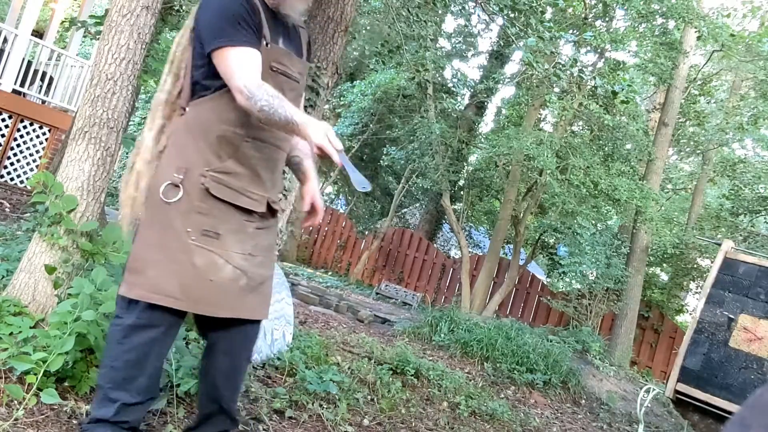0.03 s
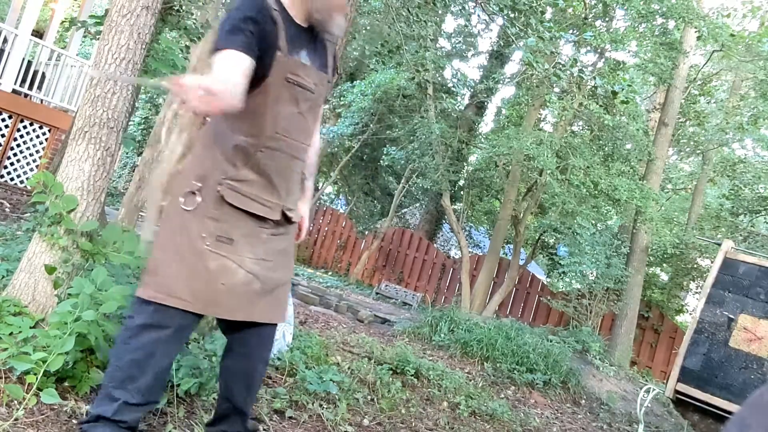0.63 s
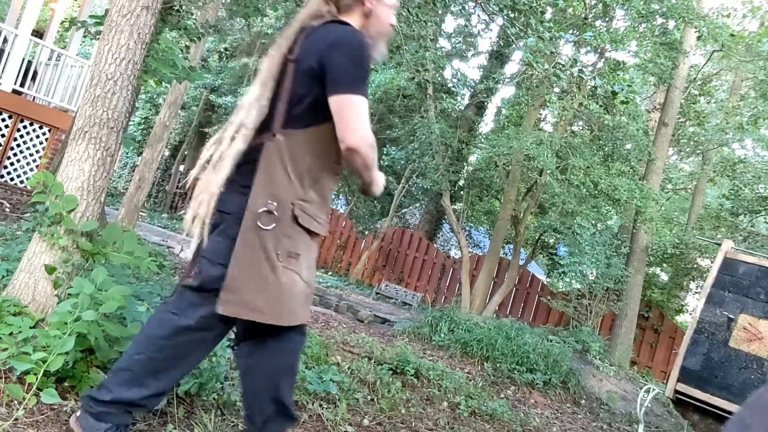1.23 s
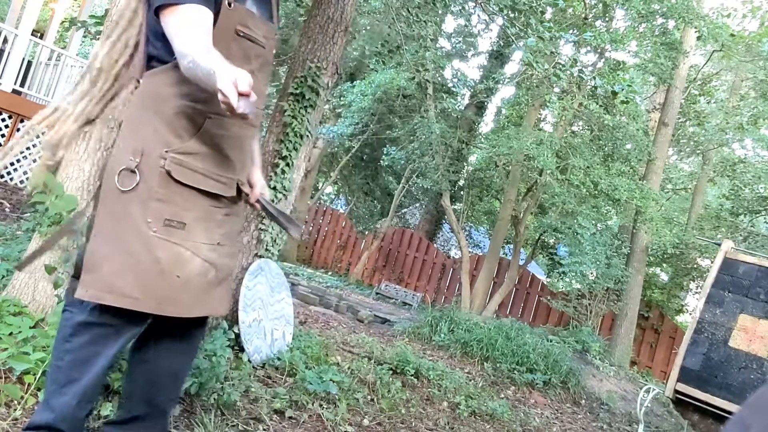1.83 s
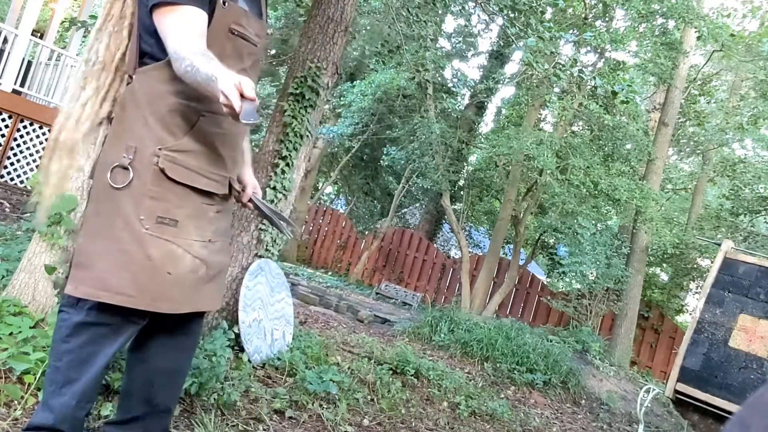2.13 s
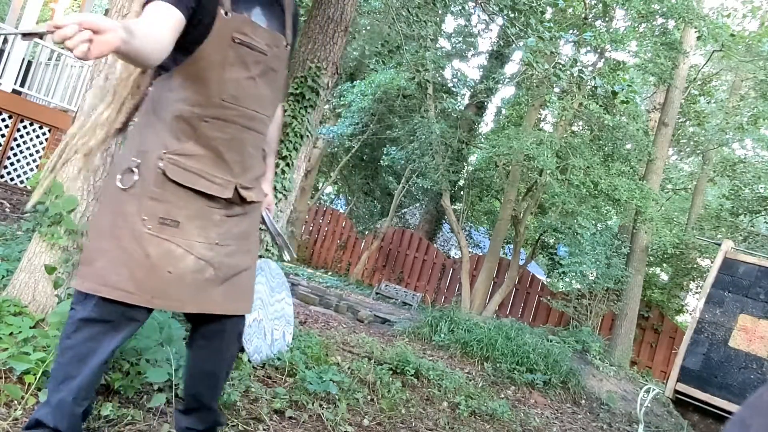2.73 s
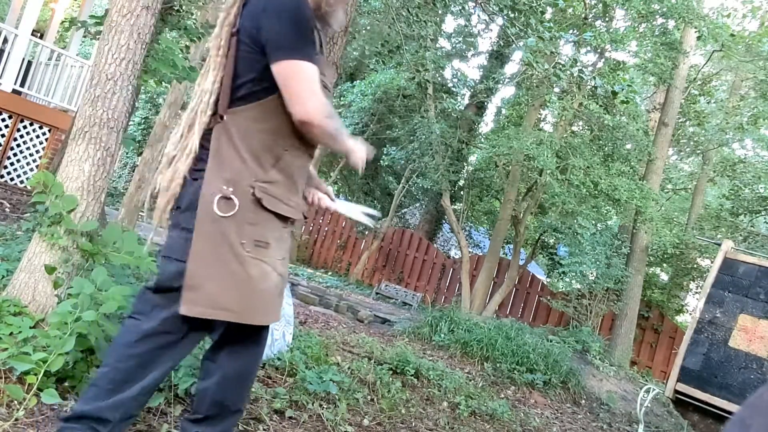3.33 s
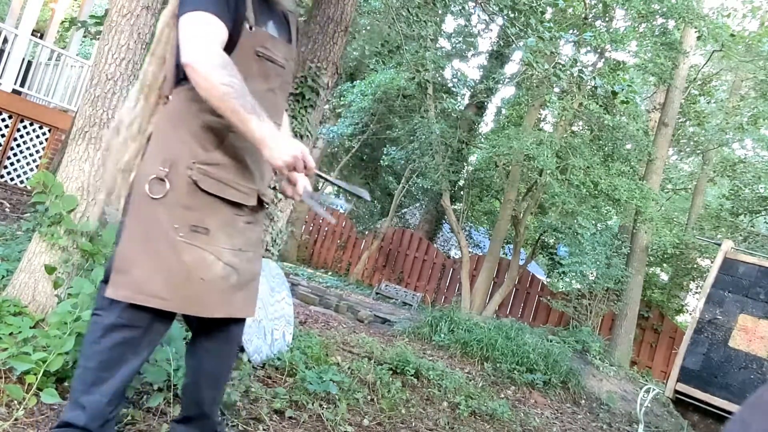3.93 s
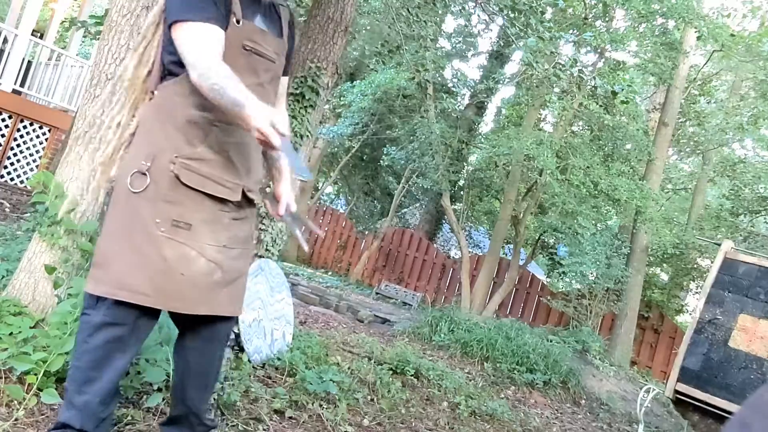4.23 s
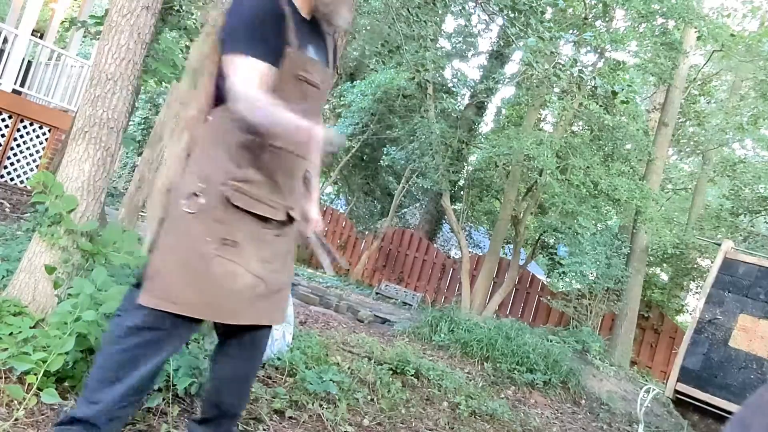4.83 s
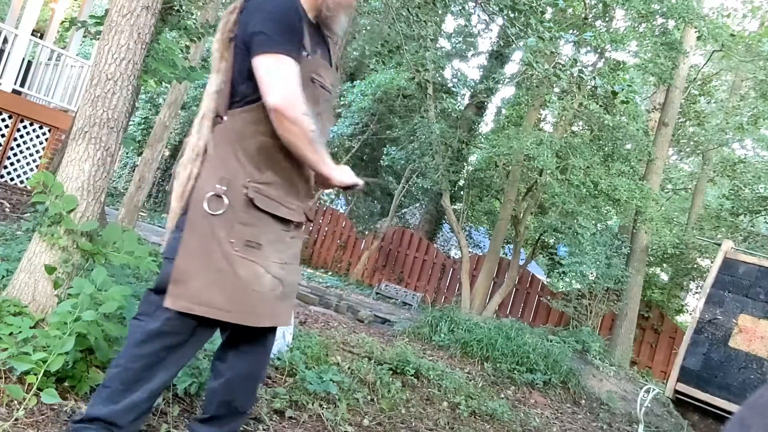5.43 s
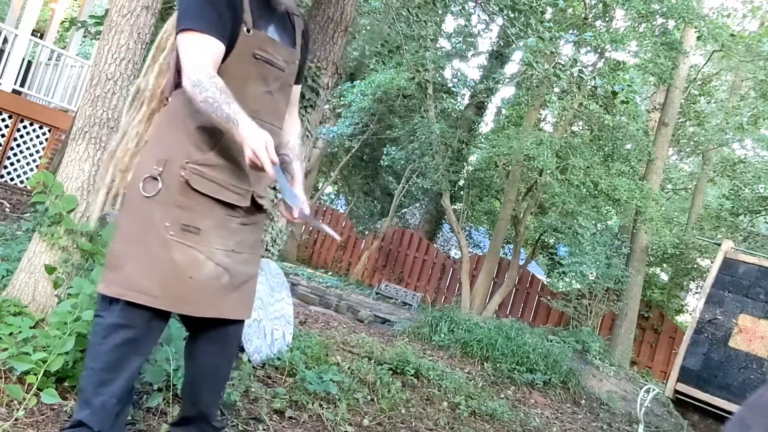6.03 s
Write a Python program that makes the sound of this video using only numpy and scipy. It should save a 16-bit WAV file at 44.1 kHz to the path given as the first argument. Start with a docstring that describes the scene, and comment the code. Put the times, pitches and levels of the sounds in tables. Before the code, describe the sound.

Three knives land in a wooden target about two seconds apart, each a sharp, crunching thud with a short outdoor echo. A twig cracks after the first, and handheld blades clink brightly just after the second. Birds whistle from the surrounding trees throughout, one nearer and one farther off, with a run of rising notes between the last two hits. Behind it all lies a faint, low town rumble.

```python
"""Knife throwing in a wooded backyard. Two songbirds whistle throughout over a faint distant hum.
At 1.2 s a knife crunches into a wooden board, stops and sets it ringing; fence and trees scatter the blow.
A twig snaps underfoot at 1.8 s. Spare knives clink in the hand around the second hit at 3.5 s,
as the near bird starts a trill. The third knife lands at 5.4 s; two single chirps follow."""
import sys
import numpy as np
from scipy import signal
from scipy.fft import irfft
from scipy.io import wavfile

SR = 44100
rng = np.random.default_rng(int(sys.argv[2]) if len(sys.argv) > 2 else 0)


def wav_out(sig):
    """Save sig, one row per channel (or a flat mono array), as 16-bit PCM at SR to the path in sys.argv[1]."""
    wavfile.write(sys.argv[1], SR, np.round(np.clip(np.atleast_2d(sig).T, -1, 1) * 32767).astype(np.int16))


N = 273420
T = np.arange(int(.8 * SR)) / SR  # event time/s


def undb(db):
    """Decibels to gain."""
    return 10 ** (np.asarray(db) / 20)


def add(out, start_s, sound):
    """Mix sound into out at start_s."""
    start = int(round(start_s * SR))
    lo, hi = max(start, 0), min(start + sound.shape[-1], N)
    out[:, lo:hi] += sound[..., lo - start:hi - start]


def pan(db):
    """Stereo gains for an L-R level difference."""
    return undb(np.array([[db], [-db]]) / 2)


def from_right(x, lag_s):
    """Sound from the right reaches the left ear later."""
    t = np.arange(x.shape[1]) / SR
    return np.array([np.interp(t - lag_s, t, x[0], left=0), x[1]])


def along(points, hz):
    """Interpolate (f/Hz, value) points over log frequency."""
    f, value = np.transpose(points)
    return np.interp(np.log(hz + 1), np.log(f), value)


def walk(rate_hz, size):
    """Random drift, spread near 1."""
    knots = rng.standard_normal(512)
    return 1.1 * np.interp(np.arange(size) / SR * rate_hz, np.arange(512), knots)


def fade(t60_s):
    """Exponential decay."""
    return undb(-60 * T / t60_s)


# diffuse field, bass alike in both ears: f/Hz, L-R correlation
EAR_CORRELATION = [(60, 1), (250, 0.3), (600, 1), (1200, 0), (2500, 0), (12000, 0.13)]


def noise(spectrum, size, correlation=None):
    """Coloured stereo noise, rms 1; diffuse by default."""
    hz = np.fft.rfftfreq(size, 1 / SR)
    alike = np.clip(along(EAR_CORRELATION, hz) if correlation is None else correlation, -1, 1)
    mid, side = np.exp(2j * np.pi * rng.random((2, len(hz))))
    mid, side = mid * np.sqrt(1 + alike), side * np.sqrt(1 - alike)
    x = irfft(np.array([mid + side, mid - side]) * undb(along(spectrum, hz)), size)
    return x / x.std()


def echoes(x, spectrum, early_t60_s, late_t60_s, late_db, onset_s):
    """Scatter from near objects, then a thinner, longer tail from the trees."""
    onset = 1 - np.exp(-(T / onset_s) ** 2)
    envelope = onset * (fade(early_t60_s) + undb(late_db) * fade(late_t60_s))
    response = noise(spectrum, len(T)) * envelope / np.sqrt(np.sum(envelope ** 2))
    return signal.fftconvolve(x[None], response, axes=1)[:, :len(x)]


# town rumble and air: f/Hz, relative level/dB
AIR_SPECTRUM = [(15, -26), (25, -30.5), (50, -4), (90, -4), (125, -3.5), (160, -9), (250, -12.5),
                (450, -24.5), (800, -31), (1100, -19), (1550, -32), (2500, -26.5), (4000, -32),
                (6000, -37.5), (9700, -36.5), (12300, -37.5), (15000, -49)]
# machine hum: f/Hz, rms level/dB
HUM_PARTIALS = [(60, -63.5), (120, -57)]


def town(air_db=-50.5, swell_db=.3, waver_db=3.5):
    """Far-off rumble and the wavering hum of a distant machine."""
    air = undb(air_db + swell_db * walk(3, N)) * noise(AIR_SPECTRUM, N)
    t = np.arange(N) / SR
    hum = 0
    for hz, db in HUM_PARTIALS:
        amplitude = np.sqrt(2) * undb(db + waver_db * walk(2.39, N))
        hum += amplitude * np.sin(2 * np.pi * hz * t + .96 * walk(3.3, N))
    return from_right(air + hum, lag_s=.0002206)


# leaves and twigs, overhead or underfoot: f/Hz, relative level/dB
LEAF_SPECTRUM = [(200, 2), (500, -1.5), (1100, -2), (2000, -10), (4000, -13), (8000, -31), (14000, -27)]


def leaves(level_db=-66):
    """Leaves stir overhead: a steady, centred rustle."""
    return undb(level_db) * noise(LEAF_SPECTRUM, N, correlation=1)


# near bird, low drop then high flick: t/s, drop level/dB, flick level/dB
TWO_NOTE_CALLS = [(.02, -78, -58.5), (.515, -62, -53.5), (.835, -61.5, -52), (1.129, -58, -55),
                  (1.358, -55, -49.5), (2.89, -65, -54), (3.195, -57, -51)]
# single notes: t/s, syllable, level/dB, echo re direct/dB, waver/fraction of pitch
SINGLE_NOTES = [(1.577, "drop", -55.5, -7, .02), (2.02, "flick", -60, -12, 0.05),
                (2.571, "flick", -73.5, 27, .2), (5.48, "flick", -55.5, -1, 0.2),
                (5.87, "flick", -62, -5, 0.13)]
# far bird, mostly echo: t/s, period/s, note count, first level/dB, pitch factor
FAR_RUNS = [(-.10, .195, 4, -65, 1), (2.80, .245, 3, -66.5, 1)]


def song(near_waver=.015, far_waver=.0599, trill_start_s=3.474, trill_period_s=.2048, hurry_s=.00136):
    """Both birds' notes: t/s, syllable, pitch factor, level/dB, echo re direct/dB, waver."""
    for start_s, drop_db, flick_db in TWO_NOTE_CALLS:
        yield start_s, "drop", 1, drop_db, .5, near_waver
        yield start_s + .1, "flick", 1, flick_db, .5, near_waver
    for start_s, syllable, db, echo_db, waver in SINGLE_NOTES:
        yield start_s, syllable, 1, db, echo_db, waver
    for k in range(10):  # trill, each gap shorter by hurry_s
        start_s = trill_start_s + k * trill_period_s - hurry_s * k * (k - 1) / 2
        yield start_s, "rise", 1, -51, 1.5, near_waver
    for start_s, period_s, count, db, tuning in FAR_RUNS:
        for k in range(count):  # each slur lower and softer
            yield start_s + k * period_s, "slur", tuning - k * .02, db - k * 2.5, 8.5, far_waver


# whistle contour per syllable: t/s, f/Hz, relative level/dB
CONTOURS = { "slur": [(0, 3150, -14), (.05, 2760, -2.5), (.09, 2420, 3), (.14, 2110, 3), (.19, 1950, -5.5)],
            "flick": [(0, 2236, -6), (.015, 2696, -10.5), (.03, 3270, 0), (.048, 3080, -9)],
            "drop": [(0, 2010, -6.5), (.015, 1950, 0), (.04, 1810, -5), (.06, 1680, 3)],
            "rise": [(0, 1768, -11.5), (.025, 1825, -4.5), (.056, 2003, 4.5), (.076, 2217, -4.5),
            (.079, 2595, 1.5), (.092, 2914, -8), (.096, 3280, 4), (.118, 3440, -7.5), (.14, 3210, -20)], }
# tree echo: f/Hz, relative level/dB
TREE_SPECTRUM = [(1700, 1), (2000, -5), (2400, 4.5), (3400, -3.5)]


def birds(flutter_db=2.5, shade_db=-11, shade_hz=2400):
    """Gliding whistles from the trees, smeared by echoes off trunks and leaves."""
    direct, scattered = np.zeros((2, 2, N))
    t = T[:len(T) // 3]
    for start_s, syllable, tuning, direct_db, echo_db, waver in song():
        knots_s, hz, db = np.transpose(CONTOURS[syllable])
        pitch_hz = tuning * np.interp(t, knots_s, hz) * (1 + waver * walk(158.3, len(t)))
        gate = np.clip(np.minimum(t, knots_s[-1] - t) / .0029, 0, 1)
        whistle = gate * undb(np.interp(t, knots_s, db)) * np.sin(2 * np.pi * np.cumsum(pitch_hz) / SR)
        # foliage shades the direct path at the top of the rising notes
        shade = (syllable == "rise") / (1 + np.exp((shade_hz - pitch_hz) / 150))
        foliage_db = shade_db * shade + flutter_db * walk(149, len(t))
        add(direct, start_s, undb(direct_db + foliage_db) * whistle * pan(-1.5))
        add(scattered, start_s, undb(direct_db + echo_db) * whistle)
    return direct + echoes(scattered[0], TREE_SPECTRUM,
                           early_t60_s=.3, late_t60_s=1.8, late_db=-7.5, onset_s=.0014)


# footfalls and twig snap: t/s, level/dB, rise/s, decay/s
CRACKLES = [(1.02, -51, 0.014, 0.089), (1.7993, -30, 0.0005, 0.0028), (1.803, -45, 0.0016, 0.04),
            (1.88, -47.5, 0.042, 0.062)]


def steps(grain_db=3):
    """Twigs and dry leaves crackle under the thrower's feet."""
    out = np.zeros((2, N))
    for start_s, db, rise_s, decay_s in CRACKLES:
        envelope = (1 - np.exp(-T / rise_s)) * np.exp(-T / decay_s)
        grain = undb(db + grain_db * walk(390, len(T)))
        add(out, start_s, grain * envelope * noise(LEAF_SPECTRUM, len(T)))
    return out


# two steel blades: f/Hz, relative level/dB, t60/s, L-R/dB
BLADE_MODES = [(1680, -16, .1, -6), (2783, -13, .12, 0), (2945, -17, .16, -2), (3930, -22, .15, 5),
               (4371, -11, .2, 0), (4527, -6, .12, 6), (4622, -2, .085, 7), (5367, -14, .14, 3),
               (6255, -7, .11, 5), (6458, -12, .1, 0), (8403, -11, .12, -5), (8560, -14, .06, 0),
               (8710, -10, .11, -1), (10543, -4, .09, -9), (10620, -8, .06, -6), (10890, -8, .055, -3),
               (11270, -12, .08, -10), (11930, -15, .1, -8), (13660, -21, .09, 4)]
# blade contacts: t/s, ring level/dB, scrape level/dB, scrape decay/s, L-R/dB
CONTACTS = [(3.255, -66, -62, 0.027, 0), (3.307, -69, -60, 0.035, -2), (3.732, -34, -43, 0.039, -1.5),
            (3.745, -37.5, -40.5, 0.016, 5), (3.813, -51, -45.5, 0.024, 0), (3.912, -55, -63, 0.053, 5),
            (5.104, -79, -61.5, 0.08, 0), (5.167, -62.5, -75, .04, -12), (5.248, -65, -72, .02, 0)]
# steel on steel: f/Hz, relative level/dB
SCRAPE_SPECTRUM = [(1200, -13), (1700, 2), (3000, 1.5), (4600, 4), (7000, -1), (9000, 1), (11500, -3),
                   (12700, -15), (15000, -27)]
# fence and tree echo of clinks and throws: f/Hz, relative level/dB
YARD_SPECTRUM = [(60, -7), (160, -3.5), (300, 0), (600, -8.5), (1100, -2.5), (1700, 8), (2600, 5.5),
                 (5000, 6.5), (12000, 0.5)]


def clinks(yard_db=-19, spread_db=2, attack_s=.00045):
    """Hand-damped blades knock and slide; each contact point favours other modes."""
    out = np.zeros((2, N))
    hz, db, t60_s, side_db = np.transpose(BLADE_MODES)
    modes = fade(t60_s[:, None]) * np.exp(2j * np.pi * hz[:, None] * T)
    ear_gains = undb(db + np.array([side_db, -side_db]) / 2)
    attack = np.minimum(T / attack_s, 1)
    for start_s, ring_db, scrape_db, decay_s, pan_db in CONTACTS:
        weights = ear_gains * undb(spread_db * rng.uniform(-1.3, 1, len(hz)))
        phasors = np.exp(2j * np.pi * rng.random(ear_gains.shape))
        ring = undb(ring_db) * ((weights * phasors) @ modes).imag
        scrape = undb(scrape_db) * np.exp(-T / decay_s) * noise(SCRAPE_SPECTRUM, len(T))
        add(out, start_s, pan(pan_db) * attack * (ring + scrape))
    yard = echoes(out.mean(axis=0), YARD_SPECTRUM,
                  early_t60_s=.16, late_t60_s=.95, late_db=-3, onset_s=.0034)
    return out + undb(yard_db) * yard


# wooden target: f/Hz, t60/s, level/dB at each of three landing spots
BOARD_MODES = [(74, .113, -12, -13, -13), (156, .39, -13, -24, -18), (161, .18, -8, -26, -11),
               (220, .049, -26, -4, -13), (269, .022, 4, -1, -2), (327, .225, -28, -32, -36),
               (381, .125, -21, -28, -24), (459, .068, -35, -17, -25), (499, .044, -20, -16, -16),
               (547, .099, -30, -23, -45), (603, .018, -7, -6, -8), (745, .014, -1, -10, -19),
               (954, .05, -26, -31, -24), (1079, .05, -15, -17, -26), (1165, .02, -7, -12, -21),
               (1360, .047, -32, -19, -34), (765, .06, -19, -34, -36)]


def board(spot, swell_cycles=1.3, sharp_fraction=.04, bend_s=.035):
    """Modes swell over their first cycles; low ones start sharp while the wood is bent hard."""
    bent_time = T + sharp_fraction * bend_s * (1 - np.exp(-T / bend_s))
    out = 0
    for k, (hz, t60_s, *spot_db) in enumerate(BOARD_MODES):
        envelope = (1 - np.exp(-T * hz / swell_cycles)) * fade(t60_s)
        clock = bent_time if hz < 200 else T
        polarity = -1 if k % 3 == 0 else 1  # some modes push air first, others pull
        out += polarity * undb(spot_db[spot]) * envelope * np.sin(2 * np.pi * hz * clock)
    return out


# knife hits: t/s, stopping time/s, thud, crunch and splinter level/dB, echo trim/dB, thud L-R/dB
HITS = [(1.2358, 0.006, 0.5, -15, -58, 0, 2), (3.5180, 0.0041, 1.5, -17, -25.5, -1, 1),
        (5.3645, 0.0072, -1, -20.5, -36.5, 2.5, 2.5)]
# crushed wood: f/Hz, relative level/dB
CRUNCH_SPECTRUM = [(200, -17), (500, -4), (900, -3), (1300, -3), (1550, -19), (2700, -14), (3800, -30),
                   (8000, -40.5)]
# splinter hiss: f/Hz, relative level/dB
SPLINTER_SPECTRUM = [(1200, 21.5), (2500, -2), (4000, 5), (6000, -2), (9500, 3), (12000, 0), (15000, -31)]


def throws(crunch_decay_s=.0031, splinter_decay_s=.015, yard_db=-7):
    """Wood crunches ever louder as the point goes in; the sudden stop kicks the board."""
    out = np.zeros((2, N))
    for spot, (start_s, stop_s, thud_db, crunch_db, splinter_db, trim_db, pan_db) in enumerate(HITS):
        stuck_s = np.maximum(T - stop_s, 0)
        depth = np.minimum(T / stop_s, 1)
        thud = undb(thud_db) * np.interp(T - stop_s, T, board(spot), left=0)
        crush = depth ** 2 * np.exp(-stuck_s / crunch_decay_s)
        crunch = undb(crunch_db) * crush * noise(CRUNCH_SPECTRUM, len(T), correlation=.47)
        hiss = undb(splinter_db) * np.exp(-stuck_s / splinter_decay_s) * noise(SPLINTER_SPECTRUM, len(T))
        hit = thud * pan(pan_db) + crunch + hiss
        yard = echoes(hit.mean(axis=0), YARD_SPECTRUM,
                      early_t60_s=.24, late_t60_s=.52, late_db=-1.5, onset_s=.0041)
        add(out, start_s, from_right(hit, lag_s=.00023) + undb(yard_db + trim_db) * yard)
    return out


def scene():
    """All sources, background first."""
    return town() + leaves() + birds() + steps() + clinks() + throws()


def record(dry):
    """Steep low-pass at 15.4 kHz."""
    return signal.sosfilt(signal.ellip(8, .2, 80, 15400, fs=SR, output="sos"), dry)


dry = scene()
out = record(dry)
wav_out(out)
```